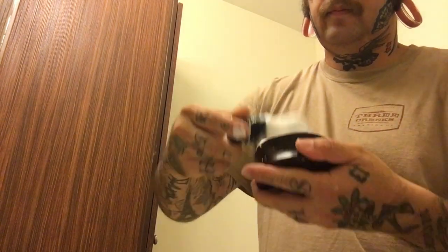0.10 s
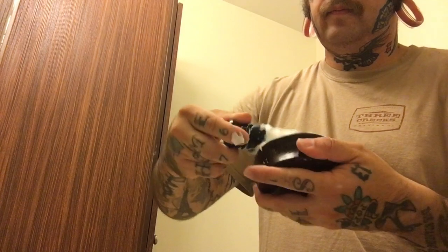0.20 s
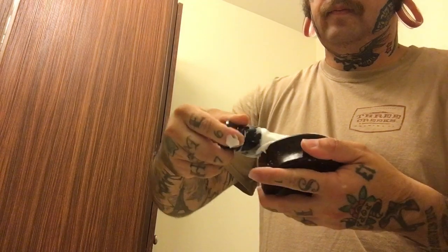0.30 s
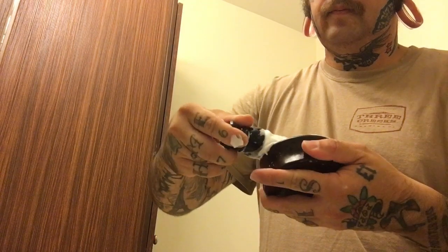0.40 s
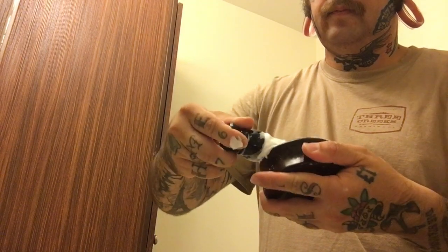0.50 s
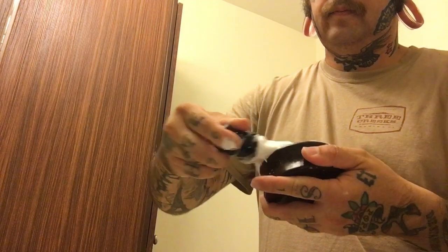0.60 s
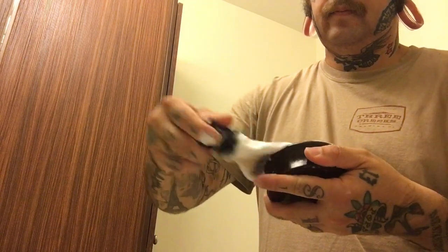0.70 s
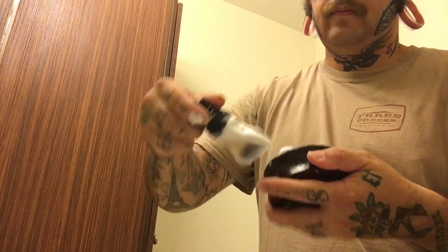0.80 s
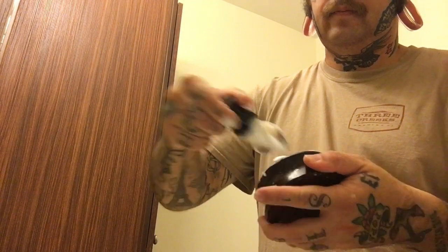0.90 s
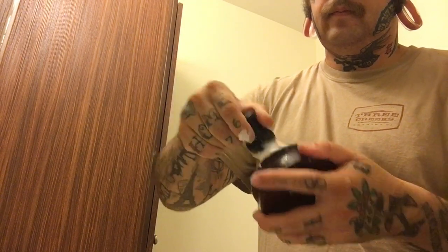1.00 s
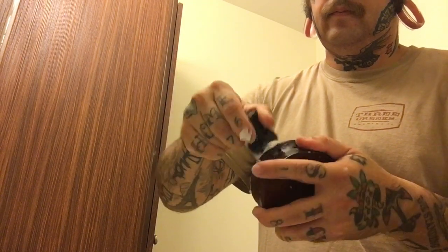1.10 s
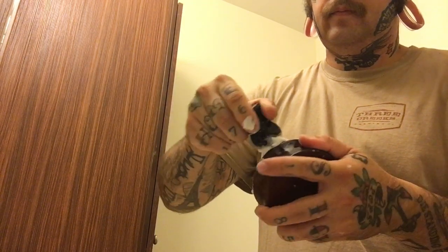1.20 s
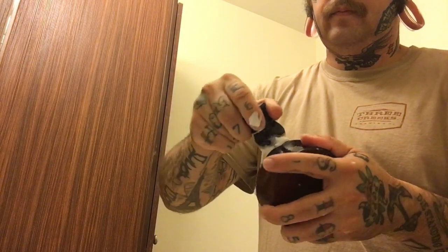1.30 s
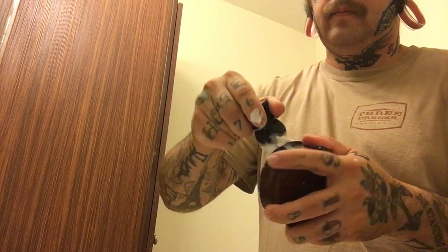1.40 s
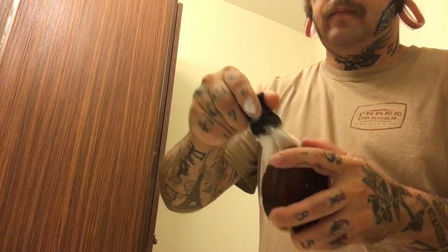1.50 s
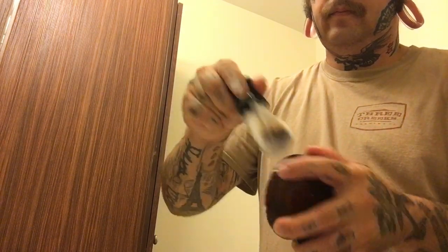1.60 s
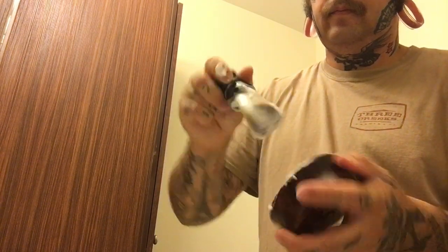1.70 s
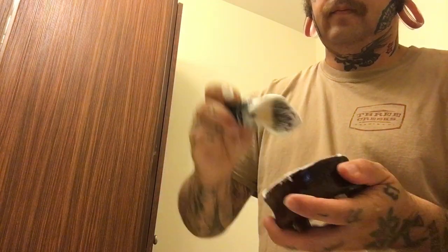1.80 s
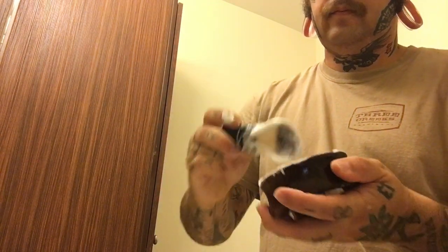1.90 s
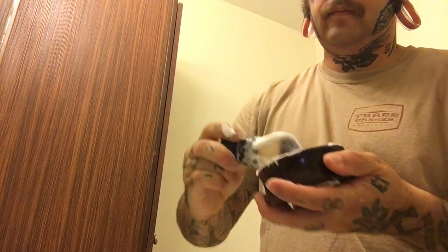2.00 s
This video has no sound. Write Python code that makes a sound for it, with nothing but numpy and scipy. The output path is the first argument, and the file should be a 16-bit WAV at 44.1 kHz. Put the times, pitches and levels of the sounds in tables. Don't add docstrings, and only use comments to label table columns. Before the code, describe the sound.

Two loud woody knocks of a brush on a hand-held bowl, the first roomier, the second drier and duller, each followed by a faint wet bristle wipe; small tiled room, close small microphone, quiet fan hum.

```python
import sys
import numpy as np
from scipy import signal
from scipy.fft import rfft, irfft, next_fast_len
from scipy.io import wavfile

SR = 44100
rng = np.random.default_rng(int(sys.argv[2]) if len(sys.argv) > 2 else 0)


def field_ratio(decibels):
    return 10 ** (np.asarray(decibels, dtype=float) / 20)


def store_pcm(level_fs):
    pcm = np.round(np.clip(level_fs, -1, 1) * 32767).astype(np.int16)
    wavfile.write(sys.argv[1], SR, np.atleast_2d(pcm).T)


N = 88200


def unit(x):
    return x / np.sqrt(np.mean(x ** 2) + 1e-20)


def along(points, hz):
    f, v = np.transpose(points)
    return np.interp(np.log(hz + 1), np.log(f + 1), v)


def curves(rows):
    s, *cols = np.transpose(rows)
    return [np.interp(np.arange(N) / SR, s, c) for c in cols]


def filtered(x, response):
    m = next_fast_len(len(x) + 8192)
    spectrum = rfft(x, m) * response(np.fft.rfftfreq(m, 1 / SR))
    return irfft(spectrum, m)[:len(x)]


def bump(hz, centre_hz, width_hz):
    return np.exp(-.5 * ((hz - centre_hz) / (width_hz / 2)) ** 2)


def noise(colour, t):
    return unit(filtered(rng.standard_normal(len(t)), lambda f: field_ratio(along(colour, f))))


def add(track, s, sound):
    part = track[round(s * SR):][:len(sound)]
    part += sound[:len(part)]


# frequency in Hz, level in dB.
AIR_COLOUR = [(15, -60), (25, -19), (48, -15.5), (126, -3.5), (267, -11), (433, -10), (598, -16),
              (5280, -32), (15500, -45.5)]
# time in seconds, level in dB, faint treble rustle of lather in dB.
AIR_LEVEL = [(0.0, -64, -1.5), (0.27, -75, 5.5), (0.41, -61.5, 2.5), (0.92, -73, 6.5), (1.2, -73.5, 0.5),
             (1.34, -62, 2), (1.48, -66, 4), (1.65, -71.5, 5), (2.0, -72, 5)]
# frequency in Hz, level in dB, width in Hz.
FAN_HUM = [(41, -73.5, 4.4), (60.1, -71.5, 9), (117.7, -74.5, 2.5), (149, -77, 11), (181, -83, 6),
           (202, -77.5, 15.1), (322, -74.5, 23), (440, -75.5, 17)]
# frequency in Hz, level in dB.
STEADY_HUM = [(59.2, -63), (118.4, -76)]


def air():
    still_hz, still_db, rustle_hz = 506, -69.5, 2525
    level_db, rustle_db = curves(AIR_LEVEL)
    hiss = filtered(rng.standard_normal(N), lambda f: field_ratio(along(AIR_COLOUR, f)))
    hiss = hiss / np.std(filtered(hiss, lambda f: (f > 300) & (f < 5000)))

    def above(hz):
        return filtered(hiss, lambda f: f ** 2 / (f ** 2 + hz ** 2))

    upper = above(still_hz)
    still = field_ratio(still_db) * (hiss - upper)
    moving = field_ratio(level_db) * (upper + (field_ratio(rustle_db) - 1) * above(rustle_hz))
    out = still + moving
    for hz, db, width_hz in FAN_HUM:
        out += field_ratio(db) * unit(filtered(rng.standard_normal(N), lambda f: bump(f, hz, width_hz)))
    for hz, db in STEADY_HUM:
        out += field_ratio(db) * np.sqrt(2) * np.sin(2 * np.pi * hz * np.arange(N) / SR)
    return out


# start in seconds, level in dB, frequency in Hz, decay in cycles.
SNAPS = [(.2344, -41, 14500, 5), (.2116, -46, 1500, 2), (.672, -55, 6000, 3), (.675, -59, 9000, 2),
         (.7486, -52, 5900, 2), (.767, -55, 8000, 2), (.675, -54, 1150, 8), (.689, -54, 1150, 8),
         (1.1532, -51, 1500, 2), (1.522, -52, 3000, 2), (1.522, -55, 6500, 3), (1.527, -61, 14000, 2),
         (1.539, -62, 14500, 2), (1.57, -58, 8000, 1), (1.651, -59, 14000, 2), (1.553, -51, 1300, 3),
         (1.5525, -52, 6300, 4), (1.5525, -58, 14000, 2), (1.598, -50, 7000, 3), (1.598, -55, 12500, 2),
         (1.602, -55, 7500, 2), (1.905, -64, 5000, 12)]


def snaps():
    out, t = np.zeros(N), np.arange(SR // 50) / SR
    for s, db, hz, cycles in SNAPS:
        add(out, s, field_ratio(db) * np.exp(-t * hz / cycles) * np.sin(2 * np.pi * hz * t))
    return out


# frequency in Hz, t60 in seconds.
TILES = [(250, 0.59), (700, 0.76), (1200, 0.53), (2300, 0.43), (4500, 0.43), (9000, 0.38), (15000, 0.22)]


def room_tail(colour, bands, early, late_db, late):
    rise_s = .004
    hz, t, z = signal.stft(rng.standard_normal(SR), SR, nperseg=256)
    fall_db = -60 * t / along(TILES, hz)[:, None]
    fade = np.hypot(field_ratio(fall_db / early), field_ratio(late_db + fall_db / late))
    tail = signal.istft(z * fade, SR, nperseg=256)[1][:SR]

    def sent(f):
        return field_ratio(along(colour, f) + sum(db * bump(f, c, w) for c, w, db in bands))

    tail = filtered(tail, sent)
    t = np.arange(SR) / SR
    start_rms = np.sqrt(np.mean(tail[:SR // 20] ** 2))
    return tail / start_rms * (1 - np.exp(-(t / rise_s) ** 2))


KNOCK_S = [.23452, 1.1759]
# click level in dB, click frequency in Hz, then crack, bristle squash and room levels in dB.
KNOCKS = [
    (-9, 1800, -21, -44, -23.5),
    (-8.5, 1637, -24, -50, -31.5),
]
# frequency in Hz, level in dB, t60 in seconds.
RINGS = [
    [(344, -34, 0.027), (1110, -27.5, 0.13), (1220, -9, 0.053), (1380, -22.5, 0.076), (1827, -17, .05),
     (2140, -5.5, 0.0078), (2960, -14, 0.01), (756, -28.5, 0.17), (4560, -28, 0.015), (5260, -31.5, .012),
     (7130, -52, 0.01058), (11300, -54.5, 0.0057)],
    [(343, -25, 0.028), (1125, -8, 0.033), (1450, -35.5, 0.037), (1825, -28, 0.031), (1988, -26, 0.12),
     (2340, -1, 0.0056), (2930, -14.5, 0.009), (4140, -21, 0.0092), (5910, -32.5, 0.011), (8060, -58, .006)],
]
# frequency in Hz, level in dB.
CRACKS = [
    [(2000, -22.5), (3000, -3.5), (4700, -1.5), (7100, -10.5), (9500, -21.5), (12000, -26), (14500, -18.5),
     (16500, -21)],
    [(2000, -22), (3200, 8.5), (4200, -19.5), (5800, -11), (8200, -15.5), (10000, -32), (15000, -62.5)],
]
# frequency in Hz, level in dB.
SQUASH = [(400, -9.5), (1000, 9.5), (2000, -1.5), (3200, -2.5), (4200, -22), (6000, -15.5), (8000, -41.5)]
# frequency in Hz, level in dB.
SENT = [
    [(88, -52), (150, -32.5), (708, -19.5), (860, -10), (1110, -2.5), (1700, -9.5), (2180, 1.5),
     (3620, -24), (15500, -49.5)],
    [(88, -70), (150, -29.5), (695, -17), (844, -7), (1090, -4.5), (1320, -15), (2270, -12), (2700, -22.5),
     (8000, -48), (15500, -56.5)],
]
# frequency in Hz, width in Hz, boost in dB.
BANDS = [
    [(382, 220, 13.5), (561, 98, -6), (720, 110, 12.5), (1660, 111, 1.5), (1820, 120, 7), (1170, 190, 6.5),
     (1423, 130, 11), (2280, 190, 4), (2840, 120, 1), (4330, 520, 4.5), (6360, 2100, 6), (9400, 820, 2.5),
     (11500, 700, 3.5)],
    [(330, 157, 2.5), (540, 110, -5.5), (670, 130, 5), (840, 160, -5), (1620, 180, 1), (1070, 140, 4),
     (1380, 170, 6.5), (1840, 88, 8), (2174, 260, 6.5), (4000, 620, 10), (5920, 450, 7.5)],
]
# early decay as a share of the t60, late tail in dB, late decay as a share of the t60.
FADES = [
    (0.8, -8.5, 1.593),
    (0.85, -5.5, 1.35),
]


def knocks():
    contact_s, sharpness, ring_rise_s = .00102, 1.84, .001
    crack_t60_s, crack_late_s = .004, .0003
    squash_s, squash_rise_db = .0228, 9
    out, t = np.zeros(N), np.arange(SR // 10) / SR
    push = np.exp(-.5 * (sharpness * (t / contact_s - 1)) ** 2)
    ring_rise = 1 - np.exp(-(t / ring_rise_s) ** 2)
    crack_rise = 1 - np.exp(-(t / crack_late_s) ** 2)
    each = zip(KNOCK_S, KNOCKS, RINGS, CRACKS, SENT, BANDS, FADES)
    for s, (db, hz, crack_db, squash_db, room_db), modes, crack, colour, bands, fade in each:
        add(out, s, field_ratio(db) * push * np.sin(2 * np.pi * hz * t))
        ring = sum(field_ratio(level - 60 * t / t60) * np.sin(2 * np.pi * f * t) for f, level, t60 in modes)
        add(out, s, -ring * ring_rise)
        add(out, s, field_ratio(crack_db - 60 * t / crack_t60_s) * crack_rise * noise(crack, t))
        squash_level = field_ratio(squash_db + squash_rise_db * (t / squash_s - 2)) * (t < squash_s)
        add(out, s - squash_s, squash_level * noise(SQUASH, t))
        add(out, s, field_ratio(room_db) * room_tail(colour, bands, *fade))
    return out


STANDING_DB = [-30.5, -38]
# frequency in Hz, level in dB, t60 in seconds.
STANDING = [
    [(704, -13.5, 0.92), (758, -17, .2), (1120, -3.5, 1), (1293, -23, 0.41), (1407, -13, 0.76),
     (1430, -17, 0.51), (1845, -13, .3), (2010, -10, 0.3), (2110, -10, .3), (2250, -8.5, 0.24),
     (2385, -12, 0.27), (966, -17.5, 0.24), (2816, -27, .29), (3070, -20.5, 1)],
    [(700, -21, 0.41), (1068, -11, 0.45), (1140, -1, 0.62), (1433, -6.5, .3), (1478, -11, .33),
     (1820, -3.5, 0.34), (1960, -9.5, .3), (2120, -11, .4), (2250, -8.5, 0.51), (2320, -10, 0.25),
     (2900, -16.5, 0.28), (3960, -21, .45)],
]


def standing_waves():
    longest_s, rise_s, beat_hz, twin_level = .55, .01, 21, 0.97
    out, t = np.zeros(N), np.arange(SR) / SR
    rise = 1 - np.exp(-t / rise_s)
    for s, level_db, modes in zip(KNOCK_S, STANDING_DB, STANDING):
        draw = rng.random((len(modes), 3))
        for (hz, db, t60), (phase, twin_phase, spread) in zip(modes, draw):
            twin_hz = hz + beat_hz * (.5 + spread)
            pair = np.sin(2 * np.pi * (hz * t + phase))
            pair += twin_level * np.sin(2 * np.pi * (twin_hz * t + twin_phase))
            add(out, s, field_ratio(level_db + db - 60 * t / min(t60, longest_s)) * pair * rise)
    return out


# centre in seconds, frequency in Hz, level in dB, length in seconds.
SWELLS = [(.268, 1095, -28, .05), (0.272, 1450, -24, .04), (0.284, 1950, -31, .05),
          (0.341, 2250, -35.5, .07), (0.346, 1837, -41.5, .05), (0.398, 1090, -40.5, .05),
          (0.423, 2222, -45, .05), (.25, 2250, -26.5, .04), (.37, 1460, -40, .06), (.445, 1120, -42, .06),
          (0.509, 1220, -49, .07), (.5, 1380, -50, .06), (.56, 720, -55, .07), (1.204, 1093, -31, .05),
          (1.228, 1010, -40.5, .05), (1.206, 1996, -35, .05), (1.227, 1812, -35, .06),
          (1.276, 2230, -45, .07), (1.305, 1101, -39.5, .05), (1.331, 1043, -38, .05),
          (1.392, 1120, -47, .07)]


def swells():
    out = np.zeros(N)
    for s, hz, db, length in SWELLS:
        t = np.arange(round(length * SR)) / SR
        add(out, s - length / 2, field_ratio(db) * np.sin(np.pi * t / length) ** 2 * np.sin(2 * np.pi * hz * t))
    return out


# time in seconds, pressure in dB, brightness in dB per octave,
# bowl mouth frequency in Hz, lather fizz in dB.
WIPES = [
    [(0.62, -80, 3, 1130, -92), (0.668, -100, 1.5, 1140, -91), (0.672, -72, -1, 1110, -84),
     (0.734, -67.5, -2, 1300, -86.5), (0.752, -61, 0, 1400, -69), (0.782, -62.5, 1.5, 1380, -68),
     (0.87, -77.5, 2.5, 1230, -85.5), (0.924, -103, -4.5, 1210, -104), (0.95, -84.5, 2.5, 1170, -100)],
    [(1.4, -78, -6, 1180, -77), (1.486, -75.5, -1.5, 1070, -83), (1.558, -67.5, -1, 1220, -78),
     (1.626, -66, 1, 1300, -78), (1.655, -70.5, 0, 1200, -70.5), (1.69, -72, 4, 1070, -77.5),
     (1.708, -81.5, 0.5, 1186, -89), (1.746, -85, -2.5, 1220, -99), (1.78, -88, 5, 1120, -93.5)],
]
# frequency in Hz, level in dB.
BRISTLES = [(240, -63), (400, -31), (543, -61), (605, -13.5), (1400, -10), (1820, -8.5), (5070, -16.5),
            (6100, -13), (15500, -34.5)]


def wipe(rows):
    slips_per_s, crackle_db, edge_s = 1500, -9, .031
    mouth_width_hz, mouth_db = 240, 13
    fizz_hz, fizz_width_hz, fizz_boost_db = 14280, 4200, 5.5
    slips = (rng.random(N) < slips_per_s / SR) * rng.standard_normal(N)
    drag = rng.standard_normal(N) + field_ratio(crackle_db) * unit(slips)
    hz, t, z = signal.stft(drag, SR, nperseg=512, noverlap=384)
    hz = hz[:, None]
    s, *controls = np.transpose(rows)
    db, tilt, mouth_hz, fizz_db = (np.interp(t, s, c) for c in controls)
    plain = field_ratio(along(BRISTLES, hz))
    plain = plain / np.sqrt(np.mean(plain ** 2 * ((hz > 4000) & (hz < 9000))))
    brightness_db = tilt * np.log2((hz + 50) / 6000)
    bristles = plain * field_ratio(db + brightness_db + mouth_db * bump(hz, mouth_hz, mouth_width_hz))
    fizz = field_ratio(fizz_db + fizz_boost_db) * bump(hz, fizz_hz, fizz_width_hz)
    inside = np.clip(np.minimum(t - s[0], s[-1] - t) / edge_s, 0, 1)
    return signal.istft(z * np.hypot(bristles, fizz) * inside, SR, nperseg=512, noverlap=384)[1][:N]


def scene():
    out = knocks()
    for rows in WIPES:
        out += wipe(rows)
    out += snaps() + swells() + air() + standing_waves()
    return out[None]


def low_pass(x):
    return signal.sosfilt(signal.butter(12, 16760, fs=SR, output="sos"), x)


def record(dry):
    port_hz, port_width_hz, port_db, top_hz = 10430, 520, -5.5, 15800
    x = filtered(dry[0], lambda f: field_ratio(port_db * bump(f, port_hz, port_width_hz)) * (f < top_hz))
    return low_pass(x[None])


dry = scene()
out = record(dry)
store_pcm(out)
```